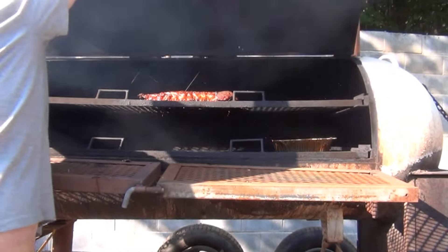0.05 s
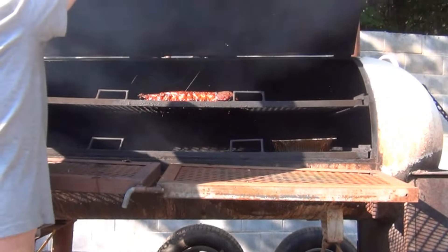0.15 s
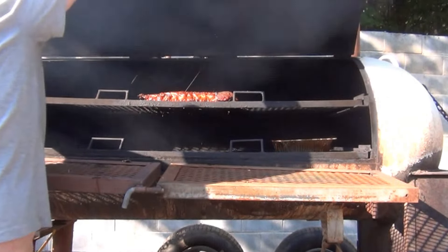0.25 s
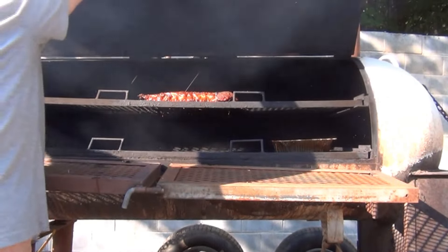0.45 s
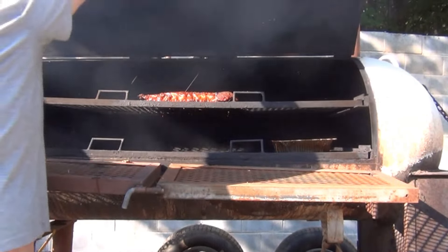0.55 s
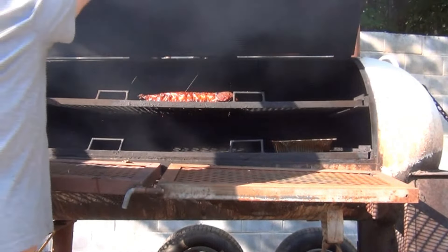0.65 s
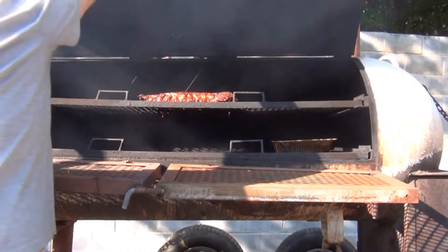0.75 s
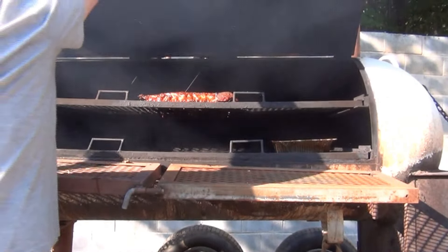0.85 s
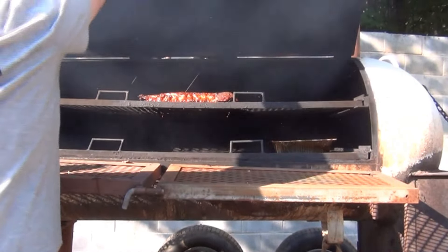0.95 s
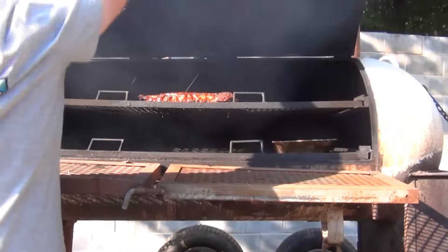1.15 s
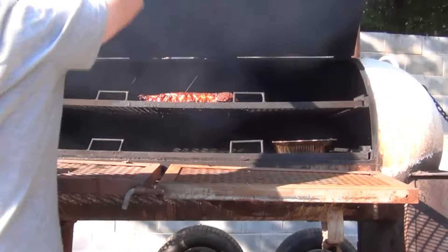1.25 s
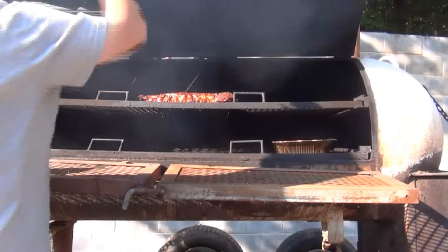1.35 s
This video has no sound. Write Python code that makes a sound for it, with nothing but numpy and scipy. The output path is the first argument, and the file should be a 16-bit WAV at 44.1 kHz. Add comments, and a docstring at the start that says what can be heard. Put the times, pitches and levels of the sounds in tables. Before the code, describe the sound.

A steel smoker lid groans briefly and clanks open, ringing out in a quiet yard.

```python
"""A faint sizzle, rustling cloth and a low motor hum sit in outdoor air, dotted with small ticks.
The steel lid of a big barrel smoker is pushed open: its hinge sticks and slips in a brief, rising groan,
then the lid meets its stop with a clank. The plate rings, the barrel booms underneath and the yard
answers. A few more ticks of utensils and spitting fat follow, and a dull double knock at the end."""
import sys
import numpy as np
from scipy import signal
from scipy.fft import rfft, irfft, next_fast_len
from scipy.io import wavfile
from scipy.ndimage import uniform_filter1d, map_coordinates

SR = 44100
rng = np.random.default_rng(int(sys.argv[2]) if len(sys.argv) > 2 else 0)


def transcribe(u):
    """Save the signal u as a 16-bit wav file named by the first command-line argument.

    u: samples, shape (n,) or (channels, n), limited to [-1, 1]; the rate is SR.
    q: integer samples, one column per channel.
    """
    v = np.clip(np.atleast_2d(u).T, -1, 1)
    q = np.round(v * 32767).astype(np.int16)
    wavfile.write(sys.argv[1], SR, q)


N = 61739
TOP_HZ = 15950


def amp(db):
    """Decibels to gain."""
    return 10 ** (np.asarray(db) / 20)


def unit(x):
    """x scaled to rms 1."""
    return x / np.sqrt(np.mean(x ** 2) + 1e-20)


def along(points, hz):
    """Read a curve of (Hz, value) points on a log frequency axis."""
    point_hz, values = np.transpose(points)
    return np.interp(np.log(hz + 1), np.log(point_hz + 1), values)


def since(start_s):
    """Seconds since start_s, zero before it."""
    return np.maximum(np.arange(N) / SR - start_s, 0)


def curves(rows):
    """Automation: one value per sample for each column after the time."""
    times, *columns = np.transpose(rows)
    return [np.interp(since(0), times, column) for column in columns]


def wobble(knots_per_s):
    """A smooth random curve, swinging about 1 either side of zero."""
    knots = rng.standard_normal(1024)
    steps = np.arange(0, N + 16, 16)
    return np.interp(np.arange(N), steps, map_coordinates(knots, [steps * knots_per_s / SR], mode="wrap"))


def filtered(x, response):
    """x through an EQ given as response(hz)."""
    size = next_fast_len(N + SR // 2)
    return irfft(rfft(x, size) * response(np.fft.rfftfreq(size, 1 / SR)), size)[..., :N]


def coloured(x, spectrum):
    """x through an EQ of (Hz, dB) points, at rms 1."""
    return unit(filtered(x, lambda hz: amp(along(spectrum, hz))))


def shaped(x, gain):
    """x through a moving EQ given as gain(hz, seconds)."""
    hz, t, frames = signal.stft(x, SR, nperseg=256)
    return signal.istft(frames * gain(hz[:, None], t), SR, nperseg=256)[1][:N]


def delayed(x, start_s):
    """x starting at start_s."""
    return np.pad(x, (round(start_s * SR), 0))[:N]


def outdoor_air():
    """A soft, bass-heavy bed of noise that drops away at the end."""
    # tone of the air: freq_hz, gain_db
    colour = [(15, -44), (30, -9), (60, -4), (115, -3), (220, -7), (320, -12.5), (700, -17), (1800, -19.5),
              (3400, -26.5), (6000, -28), (11000, -30), (15800, -59)]
    # fader ride of the air: time_s, level_db
    ride = [(0, -50), (.55, -47), (.75, -52), (.87, -48.5), (1.22, -47.5), (1.32, -52), (1.4, -73)]
    return amp(curves(ride)[0]) * coloured(rng.standard_normal(N), colour)


def cloth_rustle():
    """Rubbing cloth: midrange noise with a quick flutter in level."""
    # tone of the cloth: freq_hz, gain_db
    colour = [(100, -8), (350, 1), (1100, -3), (2400, -2.5), (5000, -13), (12000, -17.5)]
    # swells of the cloth: time_s, level_db
    swells = [(0, -48.5), (.15, -57.5), (.55, -52), (.74, -47.5), (.86, -54), (.93, -51.5), (1.05, -54),
              (1.075, -50.5), (1.11, -53), (1.13, -54.5), (1.24, -53), (1.32, -44.5), (1.4, -50)]
    return amp(curves(swells)[0] + 2.24 * wobble(40.28)) * coloured(rng.standard_normal(N), colour)


def motor_hum():
    """A distant motor: three low partials, each drifting a little in level and phase."""
    # partials of the motor: pitch_hz, level_db
    partials = [(59.5, -87), (118.6, -51.5), (177.6, -54.5)]
    # fader ride on all the partials: time_s, gain_db
    ride = [(0, -1.5), (.55, -14), (.72, 3), (1.05, -3.5), (1.4, 4.5)]
    hum = np.zeros(N)
    for hz, db in partials:
        level = amp(db + 0.75 * wobble(15.5))
        hum += level * unit(np.sin(2 * np.pi * hz * since(0) + 0.31 * wobble(10.6)))
    return amp(curves(ride)[0]) * hum


def grill_sizzle(spits_per_s=2000):
    """Tiny random spits on the grill, each a puff of noise, blur into a bright fizz."""
    # tone of the sizzle: freq_hz, gain_db
    colour = [(1500, -25), (4000, -0.5), (9000, -3), (12000, -1), (16000, -15.5)]
    # flare-ups of the sizzle: time_s, level_db
    flares = [(0, -48.5), (.1, -55.5), (.5, -57.5), (.56, -52.5), (.62, -56.5), (.69, -55.5), (.73, -48.5),
              (.86, -55), (.94, -50), (1.03, -55), (1.4, -53)]
    spits = (rng.random(N) < spits_per_s / SR) * rng.standard_normal(N)
    puffs = np.sqrt(uniform_filter1d(spits ** 2, size=60).clip(0))
    fizz = puffs * rng.standard_normal(N)
    return amp(curves(flares)[0]) * coloured(fizz, colour)


def ticks():
    """Utensils and spitting fat: short, bright bursts of band-passed noise."""
    # single ticks: start_s, level_db, t60_s, centre_hz, width_octaves
    cues = [(.183, -41, 0.056, 3900, 0.93), (.728, -40.5, 0.034, 8050, 0.63), (.801, -42, 0.043, 7100, 1.1),
            (1.057, -45, 0.032, 3970, 0.043), (1.139, -32.5, 0.039, 7300, 1.3),
            (1.176, -37.5, 0.073, 4360, 1.6), (1.3216, -28, 0.0063, 5600, 0.39),
            (1.3433, -33.5, 0.026, 3560, 1.03)]
    out = np.zeros(N)
    for start_s, db, t60, centre_hz, octaves in cues:
        band = lambda hz: np.exp(-.5 * (np.log2((hz + 1) / centre_hz) / octaves) ** 2)
        burst = unit(filtered(rng.standard_normal(N), band))
        out += delayed(burst * amp(db - 60 * since(0) / t60), start_s)
    return out


def hinge_groan(attack_s=0.0026, release_s=0.0067, rasp_db=-9, ring_db=-16):
    """The hinge sticks and slips at a rising rate: a tone, a rasp on each slip, the lid ringing along."""
    # path of the groan: time_s, slip_rate_hz, level_db
    gesture = [(.218, 403.5, -21.5), (.226, 422, -22), (.243, 441.6, -18.5), (.252, 407, -22),
               (.26, 458.7, -20), (.278, 463.4, -22), (.292, 505, -13.5), (.312, 498, -59)]
    # tone of the friction: freq_hz, gain_db
    colour = [(60, -23), (170, -6), (350, -3.5), (700, 0), (1100, -11), (2200, -17), (3000, -38),
              (8000, -38.5)]
    slip_hz, db = curves(gesture)
    phase = 2 * np.pi * np.cumsum(slip_hz * (1 + .015 * wobble(195.8))) / SR
    tone = unit(np.sin(phase) * amp(.8 * wobble(154.2)))
    slips = rng.standard_normal(N) * (1 + np.cos(phase)) ** 2
    lid_response = lid_ring([(0.0078, 0, TOP_HZ)])  # one bright tap
    ring = coloured(signal.fftconvolve(slips, lid_response)[:N], colour)
    gate = (1 - np.exp(-since(gesture[0][0]) / attack_s)) * np.exp(-since(gesture[-1][0]) / release_s)
    return gate * amp(db) * (tone + amp(rasp_db) * coloured(slips, colour) + amp(ring_db) * ring)


def lid_ring(blows, build_cycles=5, waver_per_s=33.77):
    """Each blow feeds the lid's modes, which build up over a few cycles, waver and die."""
    # modes of the steel lid: pitch_hz, level_db, t60_s
    modes = [(462, -27, 0.6), (489.4, -20, 0.17), (612, -25.5, 0.6), (634, -15.5, .35), (685, -28, 0.27),
             (768, -29, 0.55), (784.6, -26, 0.45), (911, -27, 0.29), (1000, -30.5, 0.4),
             (1169, -35.5, 0.76), (1202.7, -22, 0.45), (1369, -22, 0.23), (1391, -21.5, 0.16),
             (1550, -20, 0.16), (1620, -31, 0.37), (1682, -30.5, 0.36), (1784, -26, 0.35),
             (1939, -25, 0.27), (1980, -38, 0.78), (2260, -24.5, 0.29), (2279, -22, 0.2), (2637, -24, 0.14),
             (2893, -24, 0.13), (3037, -23, 0.15), (3130, -30, 0.14), (3620, -32, 0.099),
             (3900, -21, 0.083), (4060, -26, 0.17), (4370, -32, 0.2), (4900, -31.5, 0.17),
             (5400, -41, 0.071), (6290, -31, 0.15), (6905, -29.5, 0.15), (7660, -34, 0.058),
             (7920, -42, 0.14), (8915, -31, 0.12)]
    ring = np.zeros(N)
    steps = np.arange(0, N, 16)
    start_s, blow_db, bright_hz = np.transpose(blows)[:, :, None]
    age = np.maximum(steps / SR - start_s, 0)
    for hz, db, t60 in modes:
        fed = amp(blow_db - 60 * age / t60) * (1 - np.exp(-age * hz / build_cycles))
        energy = np.sum(fed ** 2 / (1 + (hz / bright_hz) ** 6), axis=0)  # dull blows miss the high modes
        envelope = np.interp(np.arange(N), steps, np.sqrt(energy))
        phase = 2 * np.pi * (hz * since(0) + rng.random()) + .22 * wobble(waver_per_s)
        ring += envelope * amp(db + 1.5 * wobble(waver_per_s)) * np.sin(phase)
    return ring


def lid_clank(clash_db=-13, crack_db=-17.5, crack_t60_s=0.027, ridge_spacing_hz=65, ridge_db=6.5):
    """Steel on steel: each blow gives a crack, a clash of dense overtones and ringing modes."""
    # the lid jerks free, then touches, slams and rebounds on its stop: start_s, level_db, brightness_hz
    blows = [(0.2193, -13, 910), (0.2763, -5, 2920), (.289, -1.5, 15100), (.294, -2.5, 12200),
             (.3095, -9, 3000)]
    # tone of the plate's dense overtones: freq_hz, gain_db
    clash_colour = [(80, -46), (170, -12.5), (280, -16.5), (400, 0), (900, -7.5), (1100, -12), (1600, -2),
                    (2400, -2.5), (3300, -5.5), (4600, -12.5), (7000, -11.5), (8900, -12), (9700, -26.5),
                    (13000, -24), (16000, -47)]
    # decay of those overtones: freq_hz, t60_s
    clash_decay = [(150, 0.63), (500, .33), (1500, .31), (2800, 0.16), (4500, 0.18), (8000, 0.086),
                   (13000, 0.063)]
    # tone of the contact transient: freq_hz, gain_db
    crack_colour = [(500, -31), (2500, 0.5), (5000, -3), (8500, -1), (9800, -9.5), (13000, -10.5),
                    (16000, -27)]
    out = lid_ring(blows)
    ridges = rng.uniform(-1, 1, 2048)  # the same random peaks and dips colour every clash
    overtones = lambda hz: amp(ridge_db * map_coordinates(ridges, [hz / ridge_spacing_hz], mode="wrap"))

    def clash_envelope(hz, age_s, build_cycles=1.5):
        """The highs speak first and die soonest."""
        attack = 1 - np.exp(-(age_s + 0.00055) * hz / build_cycles)
        return attack * amp(-60 * age_s / along(clash_decay, hz))

    for start_s, db, bright_hz in blows:
        metal = filtered(rng.standard_normal(N), overtones)
        clash = shaped(coloured(metal, clash_colour), clash_envelope)
        crack = coloured(rng.standard_normal(N), crack_colour) * amp(-60 * since(0) / crack_t60_s)
        blow = amp(clash_db) * clash + amp(crack_db) * crack
        lowpass = signal.butter(4, bright_hz, fs=SR, output="sos")
        out += amp(db) * delayed(signal.sosfilt(lowpass, blow), start_s)
    return out


def barrel_boom(start_s=.303, rise_s=0.031):
    """The barrel's low modes swell after the slam and fade unevenly."""
    # modes of the barrel: pitch_hz, level_db, t60_s
    modes = [(64.9, -27, 0.71), (111, -29.5, 0.81), (190.1, -31.5, 0.58)]
    age = since(start_s)
    boom = np.zeros(N)
    for hz, db, t60 in modes:
        envelope = amp(db - 60 * age / t60 + 3.5 * wobble(20.3))
        boom += envelope * np.sin(2 * np.pi * hz * age + 0.23 * wobble(26))
    return (1 - np.exp(-age / rise_s)) * boom


def double_knock(pitch_hz=1070, t60_s=0.012, rise_s=0.00039):
    """One heavily damped tone, struck twice in quick succession."""
    # dull knocks: start_s, level_db
    cues = [(1.3435, -20), (1.3581, -27.5)]
    out = np.zeros(N)
    for start_s, db in cues:
        age = since(start_s)
        envelope = amp(db - 60 * age / t60_s) * (1 - np.exp(-age / rise_s))
        out += envelope * np.sin(2 * np.pi * pitch_hz * age)
    return out


def yard_reverb(x, wet_db=-16.5):
    """The yard's walls answer with a faint tail that darkens as it dies."""
    # decay of the yard: freq_hz, t60_s
    decay = [(100, 0.82), (1500, 0.62), (3500, 0.51), (12000, 0.45)]
    tail = shaped(rng.standard_normal(N), lambda hz, age_s: amp(-60 * age_s / along(decay, hz)))
    return amp(wet_db) * signal.fftconvolve(x, tail / np.linalg.norm(tail))[:N]


def spread(mid, width, delay_s):
    """Nearly mono; a reflection spreads the sound a little to the sides."""
    side = filtered(mid, lambda hz: amp(along(width, hz)) * np.exp(-2j * np.pi * hz * delay_s))
    return np.array([mid + side, mid - side])


def scene():
    """The smoker's steel and the small ticks and knocks in their yard, over a quiet bed."""
    # stereo width of the foreground: freq_hz, side_db
    front_width = [(60, -41), (130, -53), (290, -31), (640, -25), (1410, -14.5), (3100, -14), (6820, -12.5),
                   (15000, -23)]
    # stereo width of the bed: freq_hz, side_db
    bed_width = [(60, -37), (130, -45), (290, -25), (640, -16), (1410, -12.5), (3100, -14.5), (6820, -11),
                 (15000, -29)]
    front = hinge_groan() + lid_clank() + barrel_boom() + ticks() + double_knock()
    front += yard_reverb(front)
    bed = outdoor_air() + cloth_rustle() + motor_hum() + grill_sizzle()
    return spread(front, front_width, delay_s=.0023) + spread(bed, bed_width, delay_s=.011)


def record(dry):
    """A soft clip rounds the highest peaks, then everything above TOP_HZ is cut."""
    ceiling = .9
    rounded = dry / (1 + (dry / ceiling) ** 6) ** (1 / 6)
    return filtered(rounded, lambda hz: hz < TOP_HZ)


dry = scene()
out = record(dry)
transcribe(out)
```